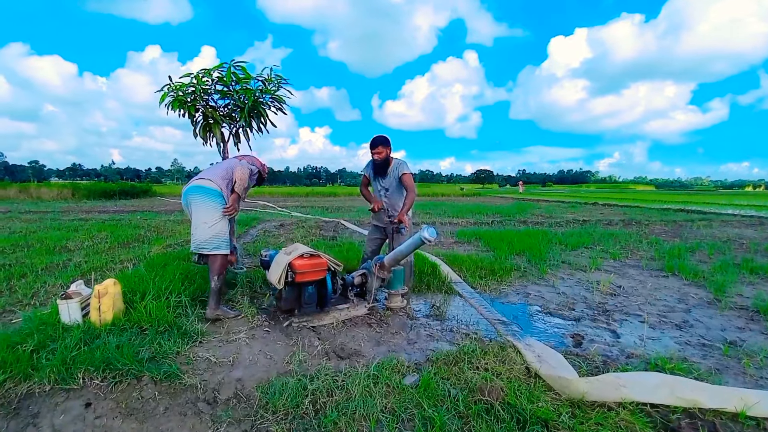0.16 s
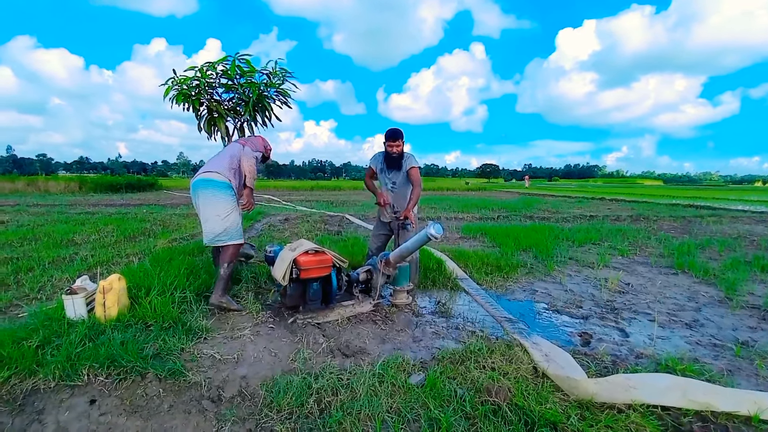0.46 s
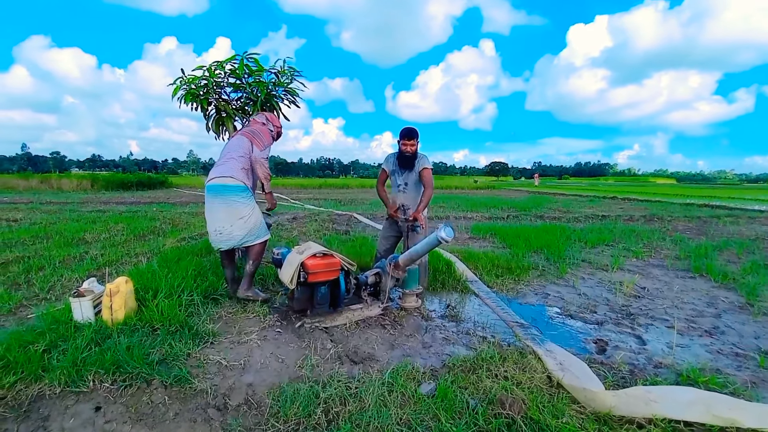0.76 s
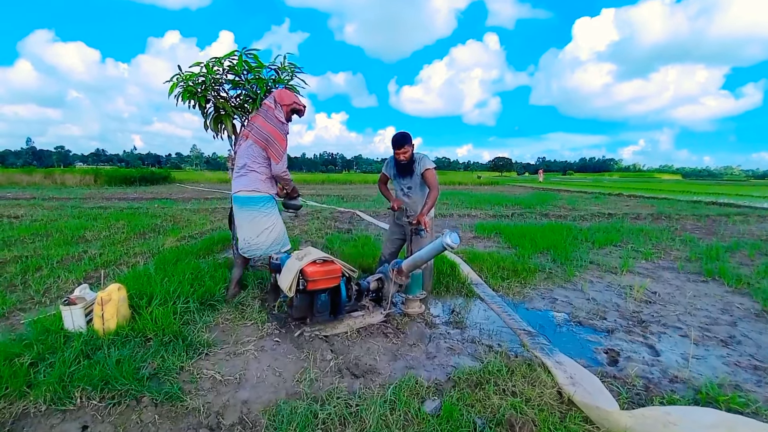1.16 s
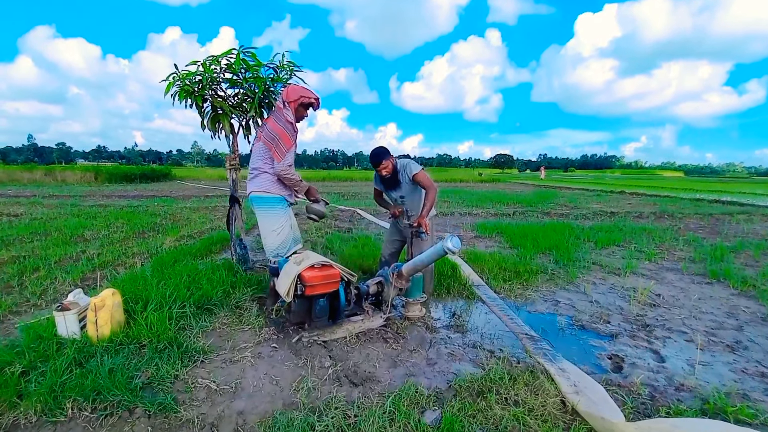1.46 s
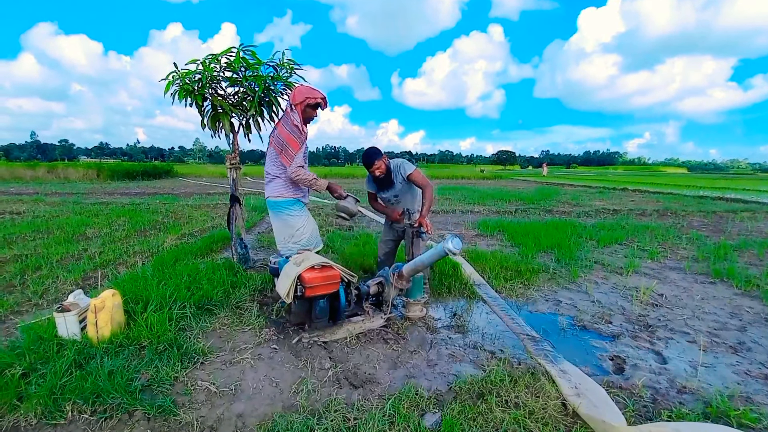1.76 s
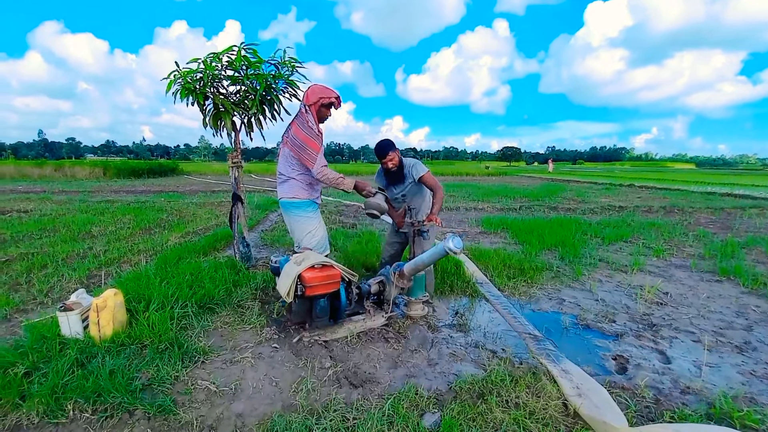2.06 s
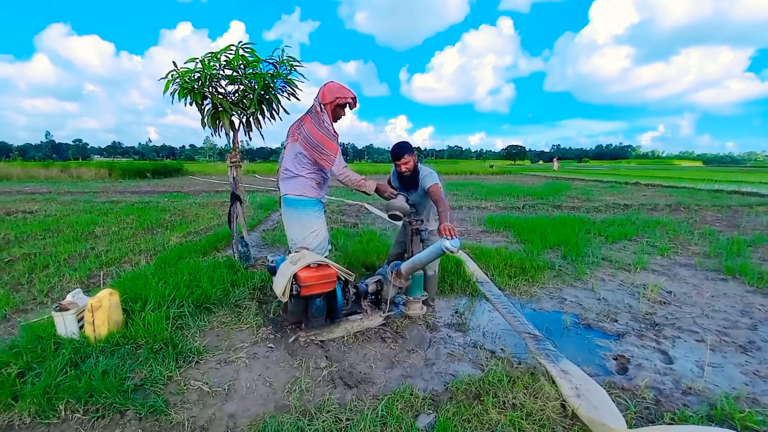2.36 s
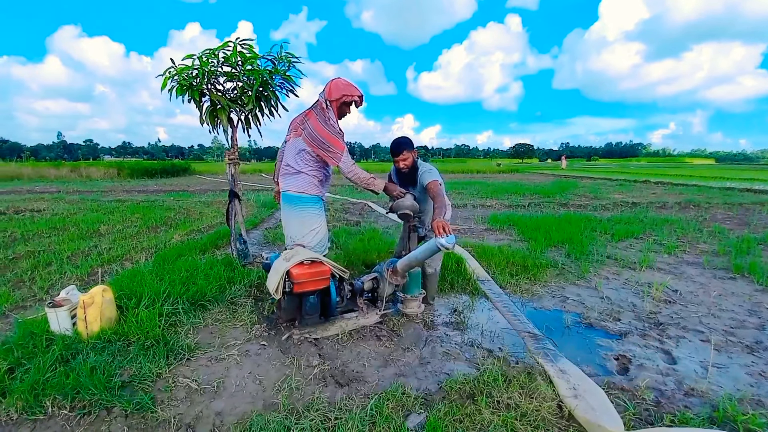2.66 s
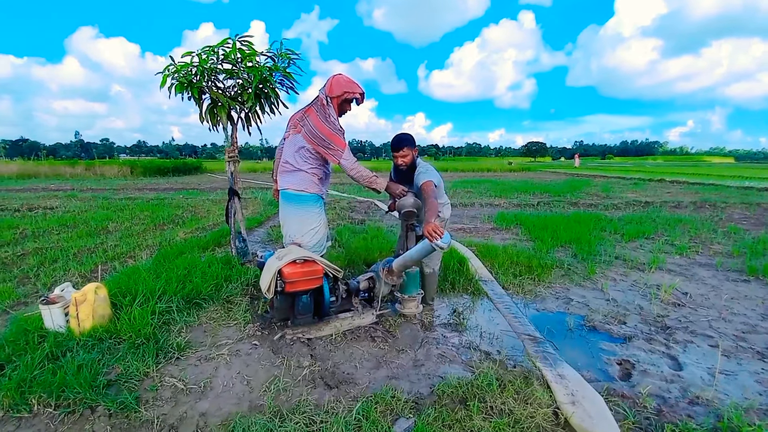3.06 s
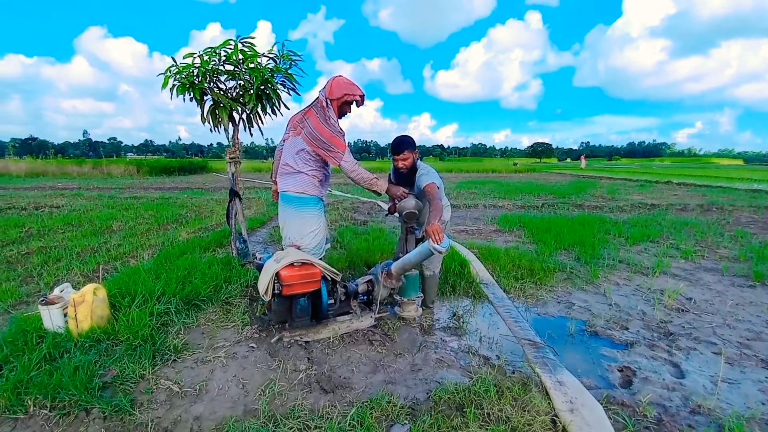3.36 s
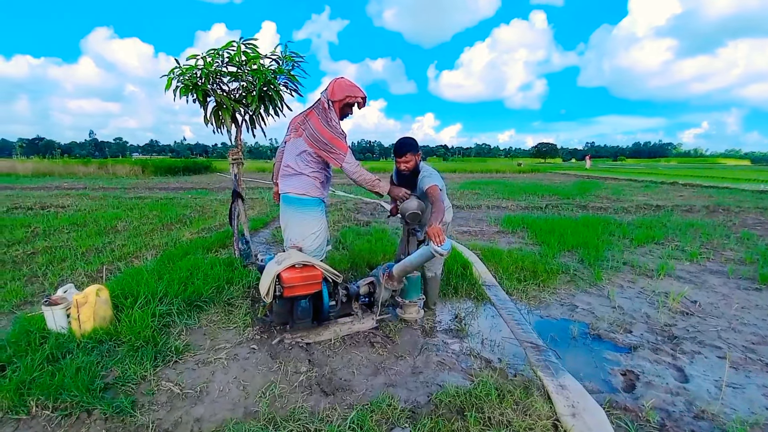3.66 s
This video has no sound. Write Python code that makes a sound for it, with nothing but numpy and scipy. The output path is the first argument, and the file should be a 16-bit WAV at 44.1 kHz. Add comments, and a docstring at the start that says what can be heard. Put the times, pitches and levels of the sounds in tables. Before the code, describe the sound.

Loose iron lever and rod clatter unevenly with hollow watery gulps, air hisses and brief high whistles; after the pumping ends, quiet diesel beat, thin birds, an insect and a frog remain outdoors.

```python
"""In an open field a slow single-cylinder diesel beats further off: pulses ring exhaust modes over rumble.
Filtered noise gives a faint hiss of open air and far trills. From the start a fast-worked iron hand pump
rattles as noise bursts ring its modes; damped tones gulp and thump in the barrel, single modes sing, air
hisses past the piston and the valve whistles in two beating tones. As the pump's buzz fades, gliding tones
chirp like small birds and a high insect; at last a frog croaks in damped tones. Two spaced microphones hear."""
import sys
import numpy as np
from scipy import signal
from scipy.fft import rfft, irfft
from scipy.io import wavfile
from scipy.ndimage import uniform_filter1d

SR = 44100
rng = np.random.default_rng(int(sys.argv[2]) if len(sys.argv) > 2 else 0)


def field_ratio(decibels):
    """Amplitude ratio for a level in dB (20 dB per decade); scalars and array-likes work."""
    return 10 ** (np.asarray(decibels, dtype=float) / 20)


def file_out(sig):
    """Save sig as 16-bit WAV at sys.argv[1]."""
    # one column per channel
    cols = np.atleast_2d(sig).T
    # limit, then scale
    lim = np.clip(cols, -1, 1)
    pcm = np.round(lim * 32767).astype(np.int16)
    wavfile.write(sys.argv[1], SR, pcm)


N = 167580
T = np.arange(N) / SR  # time [s]
FIRING_HZ, FIRST_FIRING_S = 10.168, 0.0705  # of the diesel


def colour(points, size):
    """Spectral shaping: gain at each bin, interpolated in dB over log frequency from (Hz, dB) points."""
    hz, db = np.array(points, float).T
    bins = np.fft.rfftfreq(size, 1 / SR)
    return field_ratio(np.interp(np.log(bins + 1), np.log(hz), db))


def modes(table, size, pick_db=0., stretch=0.99):
    """Modal superposition: causal response of summed resonances, their frequencies scaled by stretch."""
    f = np.fft.rfftfreq(size, 1 / SR)[:, None]
    hz, width, db = np.array(table, float).T
    hz = hz * stretch
    detuning = f / hz - hz / (f + 1)  # + 1 avoids division by zero at 0 Hz
    return (field_ratio(db + pick_db) / (1 + 1j * detuning * hz / width)).sum(axis=1)


def level(x, db):
    """Normalisation by effective value: the rms is set to db."""
    return x * field_ratio(db) / np.sqrt(np.mean(x ** 2))


def noise(points):
    """Filtered Gaussian noise: two unrelated signals of one colour, rms 1 over both."""
    white = rng.standard_normal((2, N))
    return level(irfft(rfft(white) * colour(points, N), N), 0)


def walk(rate):
    """Low-pass random modulation: smoothed chance steps at rate [1/s], with spread 1."""
    hold = int(SR / rate)
    steps = np.repeat(rng.standard_normal(N // hold + 1), hold)
    smooth = uniform_filter1d(steps, hold)[:N]
    return smooth / smooth.std()


def bell(start, length):
    """Raised-cosine envelope: a smooth swell and fade."""
    return np.sin(np.pi * np.clip((T - start) / length, 0, 1)) ** 2


def ring(start, hz, t60, rise):
    """Free damped oscillation: a tone that rises exponentially and loses 60 dB in t60 seconds."""
    u = np.clip(T - start, 0, None)
    envelope = (1 - np.exp(-u / rise)) * np.exp(-np.log(1000) * u / t60)
    return envelope * np.sin(2 * np.pi * hz * u)


def diesel_beat():
    """Impulse excitation of resonators: one firing every second turn; the turn without firing thuds."""
    # exhaust resonances: (nominal frequency [Hz], width [Hz], relative level [dB])
    exhaust = [(124.3, 36, 6), (255, 55, 4), (570, 130, -20)]
    # thud of the turn without firing: (nominal frequency [Hz], width [Hz], relative level [dB])
    idle_turn = [(81.3, 15, -6), (121, 26, -4.5)]
    # rumble spectrum: (frequency [Hz], relative level [dB])
    rumble = [(18, -75.5), (30, -18.5), (136, -2.5), (194, -10.5), (571, -28), (900, -57), (1980, -120)]
    # course of the engine's strength: (time [s], gain [dB])
    engine = [(0.0, -48), (0.33, -51), (0.51, -52), (1.05, -50), (1.35, -51.5), (1.91, -50), (2.73, -54.5),
              (3.44, -53.5), (3.8, -51.5)]
    scatter_db, jitter_s = 1.5, 0.001  # spread from pulse to pulse
    times = FIRST_FIRING_S + np.arange(-1, N / SR * FIRING_HZ) / FIRING_HZ
    pulse_colour = colour([(30, -53.5), (70, 14.5), (600, -7), (900, -48)], N)
    beat = 0
    for table, db, late in ((exhaust, 2.5, 0), (idle_turn, -5.5, 0.5 / FIRING_HZ)):
        timing, strength = rng.standard_normal((2, len(times)))
        at = ((times + late + jitter_s * timing) * SR).astype(int)
        inside = (at >= 0) & (at < N)
        pulses = np.zeros(N)
        pulses[at[inside]] = -field_ratio(scatter_db * strength[inside])
        rung = irfft(rfft(pulses) * modes(table, N) * pulse_colour, N)
        beat = beat + level(rung, db)
    low = np.array([beat, 0.11 * beat])
    low += field_ratio(4.5) * noise(rumble) * np.array([[1], [0.6]])
    return low * field_ratio(np.interp(T, *np.array(engine).T))


def diesel_knock():
    """Periodic amplitude modulation: noise decays anew from each nominal firing instant."""
    # knock spectrum: (frequency [Hz], relative level [dB])
    knock = [(1200, -18), (2200, -3), (5000, -10), (9000, -10), (15000, -15)]
    decay_s = 0.03
    since = ((T - FIRST_FIRING_S) * FIRING_HZ % 1) / FIRING_HZ
    return field_ratio(-58.5 + 2.2 * walk(FIRING_HZ)) * np.exp(-since / decay_s) * noise(knock)


def open_air():
    """Broadband noise with band-wise modulation: the bands of the hiss flicker independently."""
    # hiss spectrum: (frequency [Hz], relative level [dB])
    air_points = [(410, -39), (700, -3), (1580, 0), (2000, 8), (3940, 5), (6650, -3), (8530, 2),
                  (14600, -3), (16000, -23)]
    air = rfft(noise(air_points))
    band = np.floor(2 * np.log2(np.fft.rfftfreq(N, 1 / SR) / 700 + 1))
    return sum(field_ratio(-64 + 2.2 * walk(14)) * irfft(air * (band == k), N) for k in np.unique(band))


def trills():
    """Narrow-band noise: random beating within each band rustles like insects or birds far off."""
    # trills: (start [s], length [s], centre frequency [Hz], width [Hz], level [dB])
    trill_table = [(0, .12, 4000, 300, -62), (2.55, .3, 580, 130, -67), (2.74, .22, 3950, 200, -66),
                   (2.91, .08, 5150, 150, -67), (3.4, .45, 1150, 250, -71), (3.42, .3, 2100, 500, -68),
                   (3.72, .12, 3350, 200, -68)]
    out = np.zeros((2, N))
    for s, length, hz, width, db in trill_table:
        band = [(hz - 2 * width, -50), (hz - width / 2, 0), (hz + width / 2, 0), (hz + 2 * width, -50)]
        flicker = field_ratio(db + 2.5 * walk(36))
        out += flicker * np.sqrt(bell(s, length)) * noise(band)
    return out


def buzz():
    """Continuous random excitation: loose parts buzz on while the lever works, then fade."""
    # buzz spectrum: (frequency [Hz], relative level [dB])
    wash = [(500, -15), (1000, 3), (4000, -9), (9000, -11)]
    end_s, fade_s = 2.41, 0.04
    return field_ratio(-61 + 2.47 * walk(30.2)) * noise(wash) / (1 + np.exp((T - end_s) / fade_s))


def rattles():
    """Modal excitation by random impacts: uneven contacts and ticks ring the iron, each burst its own way."""
    # bursts of rod and lever: (time [s], nominal level below 1.5 kHz [dB],
    # level 1.5-3 kHz [dB], level above 3 kHz [dB], hold [s])
    bursts = [(0.004, -36, -56.5, -55, 0.05), (0.115, -33, -34, -39.5, 0.013),
              (0.152, -26, -33, -50, 0.041), (0.196, -28.5, -54, -49, 0.018),
              (0.261, -33, -44.5, -46.5, 0.035), (0.285, -23.5, -40.5, -53, 0.036),
              (0.337, -36, -61, -54.5, 0.031), (0.371, -37.5, -52, -62, 0.028),
              (0.464, -32, -40.5, -44, 0.019), (0.514, -27.5, -33, -50, 0.028),
              (0.539, -21.5, -33.5, -40, 0.022), (0.629, -23, -37.5, -40, 0.022),
              (0.657, -30, -42.5, -51, 0.033), (0.701, -32.5, -50, -53, 0.027),
              (0.727, -33.5, -38, -51, 0.012), (0.811, -29, -41.5, -44, 0.013),
              (0.84, -33, -41, -53, 0.029), (0.866, -21, -30.5, -45.5, 0.028),
              (0.888, -19, -32.5, -37, 0.0047), (0.973, -30.5, -38, -43.5, 0.031),
              (0.993, -25.5, -38.5, -43.5, 0.024), (1.021, -22.5, -40.5, -46.5, 0.021),
              (1.064, -32.5, -40, -52, 0.023), (1.16, -33, -40.5, -45.5, 0.024),
              (1.205, -25.5, -34.5, -43, 0.034), (1.26, -33.5, -45, -47, 0.014),
              (1.306, -28, -32, -41.5, 0.022), (1.328, -26.5, -45, -39, 0.024),
              (1.352, -45.5, -43, -53, 0.02), (1.383, -24, -32, -46.5, 0.013),
              (1.501, -31, -38, -43, 0.013), (1.53, -34, -44.5, -54.5, 0.02),
              (1.568, -30.5, -40.5, -46.5, 0.016), (1.658, -27.5, -37, -40, 0.023),
              (1.707, -29, -42.5, -52.5, 0.033), (1.764, -32.5, -52.5, -62, 0.01),
              (1.835, -32, -39.5, -46.5, 0.019), (1.869, -38, -47, -58, 0.03),
              (1.911, -30, -43.5, -51, 0.03), (1.94, -48, -46.5, -63, 0.054),
              (1.979, -36, -37, -43.5, 0.019), (1.991, -21.5, -31.5, -36, 0.027),
              (2.049, -32, -48, -51, 0.022), (2.07, -53, -55, -51, 0.003), (2.097, -43, -55, -58.5, 0.041),
              (2.165, -51, -54.5, -57, 0.015), (2.224, -33.5, -44, -48.5, 0.03),
              (2.329, -36, -32.5, -35.5, 0.014), (2.359, -37.5, -71, -62, 0.025)]
    # modes of the iron: (nominal frequency [Hz], width [Hz], relative level [dB])
    iron = [(560, 42, 2), (1170, 37, -0.5), (1520, 89, 1), (1773, 70, 4), (2090, 176, -3.5),
            (3352, 100, -8.5), (4670, 28, -9.5)]
    # clatter between the modes: (frequency [Hz], relative level [dB])
    clatter = [(200, -8.5), (350, -12.5), (800, -3), (1500, -20), (2600, -9), (3200, -34.5), (8000, -21),
               (16000, -30.5)]
    attack_s, release_s, tail_s, tail_db = 0.0019, 0.014, 0.028, -27
    snap_s, snap_db = 0.0047, -6  # extra strength at the first contact
    crest_db = -8.5  # from the low band's nominal level to its rms
    pick_db, detune = 0.5, 0.025  # spread from burst to burst: level of each mode, share of its frequency
    ripple_db, grain_db = 4, 3.5  # spread over frequency and over time
    ticks_per_s, tick_db = 700, 5
    size, lead = 8192, 512  # samples; the lead leaves room ahead of the onset
    out = np.zeros((2, N + size))
    u = np.clip(np.arange(size) - lead, 0, None) / SR
    f = np.fft.rfftfreq(size, 1 / SR)
    bands = [f < 1500, (f >= 1500) & (f < 3000), f >= 3000]
    for s, low_db, mid_db, top_db, hold in bursts:
        release = np.exp(-np.clip(u - hold, 0, None) / release_s)
        tail = field_ratio(tail_db) * np.exp(-u / tail_s) * (1 - u / u[-1])
        shape = np.minimum(u / attack_s, 1) * (release + tail)
        shape *= 1 + field_ratio(snap_db) * np.exp(-u / snap_s)

        # smoothing over n samples, times sqrt(n), keeps the spread at 1
        grain = field_ratio(grain_db * uniform_filter1d(rng.standard_normal(size), size=64) * 8)
        ticks = np.repeat(rng.random(size // 8) < 8 * ticks_per_s / SR, 8)
        grain *= 1 + field_ratio(tick_db) * ticks

        pick, shift = rng.standard_normal((2, len(iron)))
        body = modes(iron, size, pick_db * pick, 1 + detune * shift) + colour(clatter, size)
        ripple = uniform_filter1d(rng.standard_normal(len(f)), size=25) * 5
        body *= field_ratio(ripple_db * np.minimum(f / 2500, 1) * ripple)

        # bring each band to its level, with smooth joins
        tilt = 0
        for band, db in zip(bands, (low_db + crest_db, mid_db, top_db)):
            tilt = tilt + band * field_ratio(db) / np.sqrt(np.sum(abs(body[band]) ** 2) / len(f))
        body *= np.exp(uniform_filter1d(np.log(tilt), size=60))

        hits = rng.standard_normal((2, size)) * grain / np.sqrt(np.mean(grain ** 2)) * shape
        i = int(s * SR)
        out[:, i:i + size] += irfft(rfft(hits) * body, size)
    return out[:, lead:N + lead]


def gulps_and_thumps():
    """Damped cavity resonance: hollow gulps and lower valve thumps, with slosh noise following them."""
    # gulps and thumps: (time [s], nominal level [dB], frequency [Hz], 60 dB decay time [s])
    gulp_table = [(0.018, -40.5, 258, 0.12), (0.295, -32.5, 268, 0.15), (0.371, -36, 244, 0.2),
                  (0.437, -38, 207, 0.13), (0.607, -47, 155, 0.16), (0.654, -22.5, 261.6, 0.066),
                  (0.721, -32.5, 255, 0.11), (0.752, -46, 153, 0.21), (0.785, -30.5, 216, 0.071),
                  (1.011, -31.5, 241, 0.15), (1.084, -35.5, 248, 0.097), (1.132, -37.5, 218.6, 0.12),
                  (1.332, -36, 231, 0.046), (1.369, -30, 265, 0.16), (1.467, -32.5, 217, 0.075),
                  (1.702, -25.5, 268, 0.056), (1.744, -29.5, 143, 0.041), (1.807, -33.5, 213, 0.066),
                  (2.023, -38.5, 270, 0.16), (2.101, -37.5, 241, 0.18), (2.175, -40.5, 209, 0.089)]
    gulps = 0
    for s, db, hz, t60 in gulp_table:
        rise_s = 0.004 if hz < 235 else 0.0056  # thumps rise faster
        gulps = gulps + field_ratio(db + 9) * ring(s - 0.004, hz, t60, rise_s)
    gulps = gulps * field_ratio(2 * walk(60))
    strength = uniform_filter1d(abs(gulps), size=1300)
    slosh = field_ratio(-5) * strength * noise([(120, -33), (220, 4), (450, -14), (800, -43)])
    return slosh + np.array([gulps, 0.068 * gulps])


def rings():
    """Frictional excitation of single modes: the iron sings, wavering, while a joint rubs."""
    # singing modes: (start [s], length [s], mean frequency [Hz], level [dB])
    ring_table = [(0.11, 0.036, 1150, -36), (0.266, 0.029, 1170, -36), (0.276, 0.035, 560, -37),
                  (0.464, 0.025, 3350, -40), (.545, 0.031, 2100, -30.5), (.546, 0.015, 4670, -30),
                  (0.618, 0.088, 1170, -37), (0.672, 0.038, 720, -35), (0.732, 0.0077, 2310, -30.5),
                  (0.733, 0.041, 1400, -39), (0.802, 0.048, 1100, -38.5), (0.88, 0.018, 4670, -28.5),
                  (0.863, 0.016, 1850, -27.5), (1.051, 0.056, 600, -34.5), (1.167, 0.024, 3350, -40),
                  (1.214, 0.042, 1820, -35), (1.37, 0.021, 590, -49), (1.505, 0.092, 1780, -33),
                  (1.872, 0.045, 1780, -36), (1.909, 0.029, 1780, -31), (1.922, 0.056, 2450, -42.5),
                  (1.996, 0.06, 4670, -37), (2.052, 0.063, 1400, -45), (2.081, 0.081, 730, -41),
                  (2.225, 0.091, 1780, -45), (2.348, 0.021, 2484, -40), (2.364, 0.03, 570, -41)]
    drift, waver_db = 0.013, 4.5  # spread of frequency (as a share) and of level
    out = np.zeros((2, N))
    for s, length, hz, db in ring_table:
        phase = 2 * np.pi * np.cumsum(hz * (1 + drift * walk(150))) / SR
        offset = np.array([[0], [2 * np.pi * rng.random()]])  # between shared and unshared part
        strength = field_ratio(db + waver_db * walk(120)) * np.sqrt(bell(s, length))
        out += strength * np.sin(phase + offset)
    return out


def piston_hiss():
    """Turbulent flow noise: puffs of air pass the piston."""
    # puffs: (centre time [s], half length [s], level [dB])
    puffs = [(0.191, 0.022, -34.5), (0.547, 0.014, -27.5), (0.889, 0.02, -30), (0.999, 0.014, -33),
             (1.332, 0.017, -35.5), (2.012, 0.028, -35.5), (2.344, 0.02, -33)]
    # hiss spectrum: (frequency [Hz], relative level [dB])
    hiss_points = [(1500, -43), (2500, -6.5), (4600, 1), (6000, -7.5), (8100, 0), (10000, -11.5),
                   (13700, -7), (16000, -32)]
    flow = sum(field_ratio(db) * bell(s - half, 2 * half) for s, half, db in puffs)
    return flow * field_ratio(2 * walk(300)) * noise(hiss_points)


def valve_whistles():
    """Beating of two close tones: whistles as the valve shuts, with air noise around them."""
    # whistles: (start [s], level of the upper tone's peak [dB])
    whistle_table = [(0.435, -48), (0.787, -22), (1.136, -35.5)]
    strength = 0
    for s, db in whistle_table:
        progress = np.sqrt(np.clip((T - s) / 0.041, 0, 1))  # the root makes a quick rise, a slower fall
        strength = strength + field_ratio(db) * np.sin(np.pi * np.clip(progress / 0.87, 0, 1)) ** 2
    upper = np.sin(2 * np.pi * 10030 * T + 0.5 * walk(310))
    lower = field_ratio(-8) * np.sin(2 * np.pi * 9830 * T)
    scratch = field_ratio(-18) * strength * noise([(7000, -37), (8500, -8), (10000, 4), (13000, -20)])
    return scratch + strength * (upper + lower) * np.array([[1], [0]])


def bird_and_insect_chirps():
    """Frequency modulation: tones glide down, with a roughness that grows with pitch."""
    # chirps: (start [s], glide length [s], from frequency [Hz], to frequency [Hz], level [dB])
    chirps = [(2.42, .13, 4700, 3900, -63), (2.62, .025, 5300, 4700, -65), (2.975, .085, 3900, 2800, -62),
              (3.19, .033, 5200, 3600, -57), (3.35, .038, 5600, 3600, -56), (3.505, .042, 5000, 3100, -56),
              (3.41, .17, 12700, 11700, -57), (3.7, .1, 13600, 12600, -64)]
    out = np.zeros((2, N))
    for s, length, hz0, hz1, db in chirps:
        hz = hz0 + (hz1 - hz0) * np.clip((T - s) / length, 0, 1)
        hz += 2.5 * (hz / 1000) ** 2 * walk(500)
        strength = field_ratio(db + 2.5 * walk(200)) * bell(s, length * 1.2)
        out[0] += strength * np.sin(2 * np.pi * np.cumsum(hz) / SR)
    return out


def frog_croak():
    """Pulsed damped resonance: three quick pulses, each a tone and an overtone dying away together."""
    # pulses: (start [s], nominal level [dB])
    croaks = [(3.599, -48), (3.62, -48.5), (3.637, -53)]
    t60_s = 0.019
    out = np.zeros((2, N))
    for s, db in croaks:
        overtone = field_ratio(-5) * ring(s, 2110, t60_s, 0.001)
        out[0] += field_ratio(db + 9.5) * (ring(s, 1076, t60_s, 0.0008) + overtone)
    return out


def scene():
    """Interchannel coherence: shared and unshared parts mix so that likeness depends on frequency."""
    # likeness of left and right: (frequency [Hz], coherence [0-1])
    alike = [(60, 0.74), (130, 1), (290, 0.73), (640, 1), (1410, 0.058), (3100, 0.18), (6820, 0.4),
             (15000, -0.0)]
    left_db, left_lead_s = -1.63, 0.00014  # left against right; the lead shrinks with the likeness
    pump = buzz() + rattles() + gulps_and_thumps() + rings() + piston_hiss() + valve_whistles()
    engine = diesel_beat() + diesel_knock()
    field = open_air() + trills() + bird_and_insect_chirps() + frog_croak()
    shared, apart = rfft(pump + engine + field)
    f = np.fft.rfftfreq(N, 1 / SR)
    hz, likeness = np.array(alike).T
    c = np.clip(np.interp(np.log(f + 1), np.log(hz), likeness), 0, 1)
    a = shared * np.sqrt(1 + c)
    b = apart * np.sqrt(1 - c)
    lead = np.exp(1j * np.pi * f * left_lead_s * c)  # half the lead on each side
    left = (a + b) * lead * field_ratio(left_db / 2)
    right = (a - b) / lead / field_ratio(left_db / 2)
    return irfft(np.array([left, right]), N) / np.sqrt(2)


def roll_off(x):
    """The treble ends steeply here."""
    return signal.sosfilt(signal.butter(12, 16640, fs=SR, output="sos"), x)


def record(dry):
    """Band-limited transduction: the microphones lose the deepest bass and the highest treble."""
    # microphone response: (frequency [Hz], gain [dB])
    mic = [(45, -17), (65, -1.5), (15100, -1.5), (15900, -45)]
    heard = irfft(rfft(dry) * colour(mic, N), N)
    return roll_off(heard)


dry = scene()
out = record(dry)
file_out(out)
```